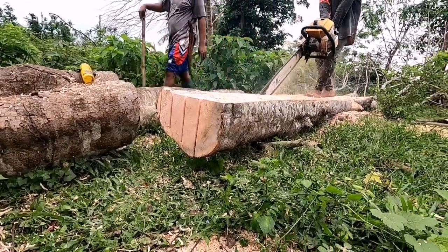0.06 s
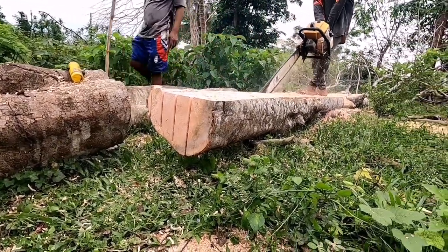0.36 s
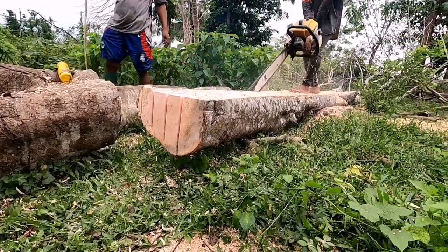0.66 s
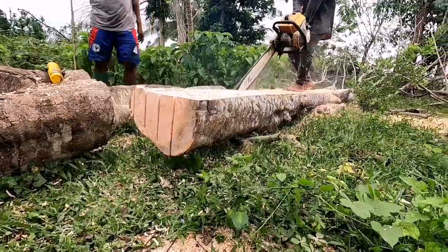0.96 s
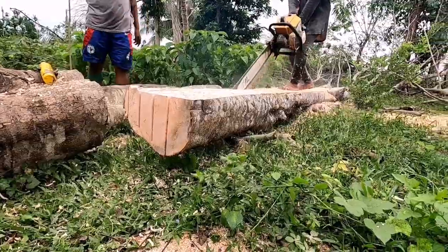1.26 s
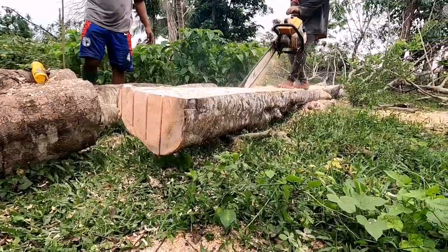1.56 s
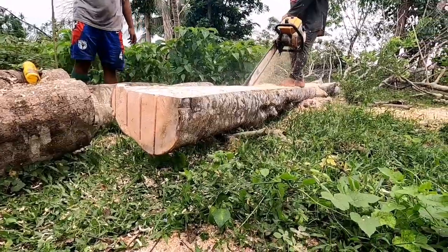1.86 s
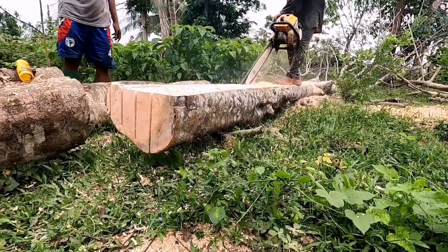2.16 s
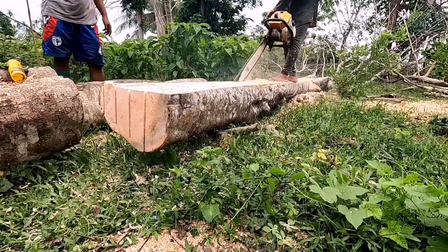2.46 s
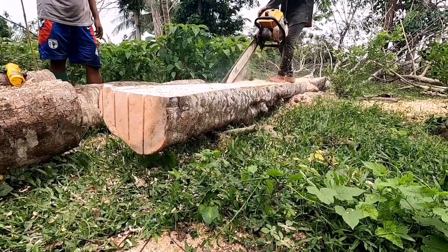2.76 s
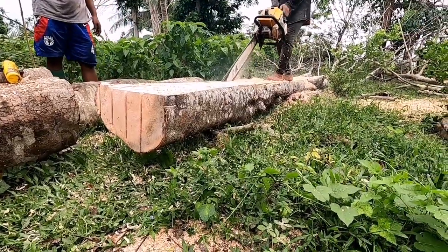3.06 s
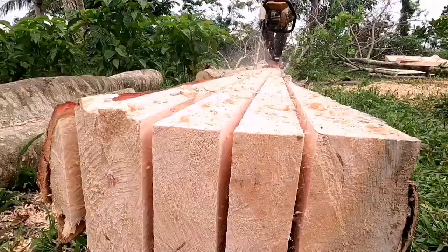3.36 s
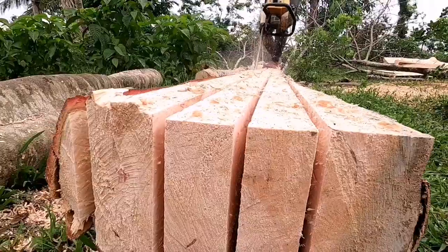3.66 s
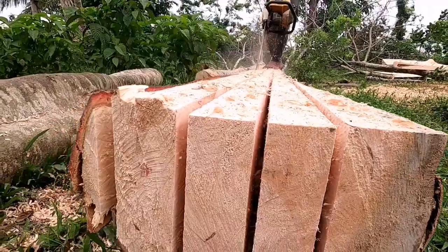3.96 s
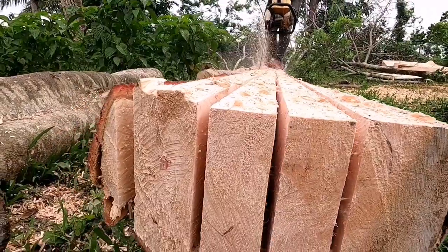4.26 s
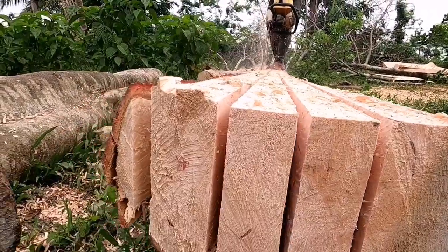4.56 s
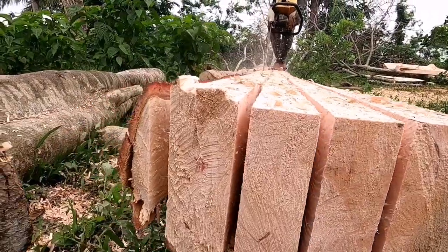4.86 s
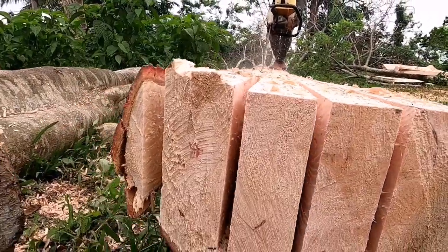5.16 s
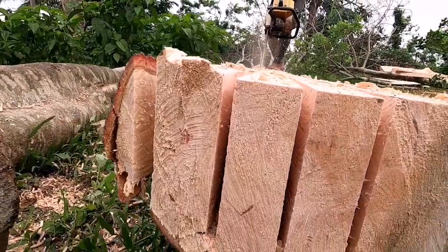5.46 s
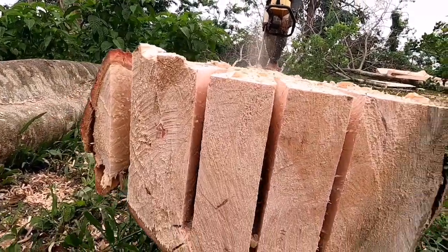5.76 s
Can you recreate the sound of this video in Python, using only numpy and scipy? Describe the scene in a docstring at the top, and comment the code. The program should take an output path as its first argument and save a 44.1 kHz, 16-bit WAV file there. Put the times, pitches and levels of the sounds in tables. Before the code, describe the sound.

A two-stroke chainsaw snarls at full throttle through a log outdoors, cuts out for an instant, then resumes slightly deeper.

```python
"""A two-stroke chainsaw snarls at full throttle, ripping along a log outdoors, heard from the side;
after a short silence it is heard from the log's end. Each firing sends a bark and a rasp of gas
through the muffler; when the load eases, the engine fires only every second turn and puffs between.
The chain tears out chips, the drive buzzes, the trees scatter it all back,
and a breeze rumbles on the microphone."""
import sys
import numpy as np
from scipy import signal
from scipy.fft import rfft, irfft
from scipy.io import wavfile
from scipy.ndimage import uniform_filter1d, map_coordinates

SR = 44100
rng = np.random.default_rng(int(sys.argv[2]) if len(sys.argv) > 2 else 0)


def wav_record(signal):
    """Record a signal, one row per channel, as 16-bit PCM in the file named by sys.argv[1]."""
    frames = np.transpose(np.atleast_2d(signal))
    bounded = np.clip(frames, -1, 1)
    # unit amplitude maps onto the largest positive 16-bit level
    quanta = np.round(bounded * 32767).astype(np.int16)
    wavfile.write(sys.argv[1], SR, quanta)


N = 260631
TIME = np.arange(N) / SR

# Crank speed, climbing while every turn fires, sagging in misfires or a deeper bite: time_s, speed_hz
SIDE_REVS = [(.0087, 91.77), (.105, 90.07), (.518, 93.29), (.737, 88.18), (1.0, 100.59), (1.338, 91.38),
             (1.992, 101.35), (2.002, 96.5), (2.433, 98.89), (2.815, 87.77), (2.949, 95.17), (3.2, 98.24),
             (3.39, 82.45)]
END_REVS = [(3.5585, 93), (3.69, 82.6), (4.065, 92.24), (4.203, 99.75), (4.387, 86.89), (4.585, 85.6),
            (4.938, 101.53), (5.027, 91.97), (5.181, 99.43), (5.397, 82.43), (5.725, 98.51), (5.799, 97.58),
            (5.91, 106.7)]
# Spells of running light, a miss after each firing: first_miss_s, last_miss_s, base_burn_share
LIGHT_SPELLS = [(1.058, 1.297, .15), (1.995, 2.169, .05), (2.262, 2.775, .06), (3.014, 3.077, .18),
                (3.210, 3.364, .08), (3.571, 3.684, .06), (3.907, 3.907, .6), (4.188, 4.229, .26),
                (4.260, 4.260, .25), (4.291, 4.425, .04), (4.655, 4.655, .1), (4.970, 5.055, .27),
                (5.200, 5.329, .14)]
# Stumbles, where this turn and the one before both miss: time_s
DOUBLE_MISSES = [1.067, 2.026, 2.643, 5.012, 5.066, 5.252, 5.306]
# Tone of one exhaust bark as it arrives over the ground: pitch_hz, level_db
SIDE_BARK = [(45, 18), (90, 28), (140, 27.5), (185, 24.5), (275, 7.5), (380, 16.5), (480, 10), (680, 20),
             (830, 19), (950, 25), (1250, 11), (1650, -2.5), (2900, -5.5), (4000, -13), (7000, -41.5)]
END_BARK = [(30, -8), (88, 32.5), (185, 31.5), (270, 18.5), (375, 7), (480, 19.5), (720, 28), (900, 17.5),
            (1150, 13.5), (1500, -2), (2300, 10.5), (3200, 8), (3800, -14), (7000, -34.5)]
# Ring of the muffler's shell: pitch_hz, width_hz, lift_db
SIDE_SHELL = [(2160, 300, 11), (3253, 260, 19.5), (4700, 100, 20)]
END_SHELL = [(2850, 330, 5.2), (3310, 150, 10.4)]
# Tone of the soft puff of an unburnt charge: pitch_hz, level_db
SIDE_PUFF = [(45, 20), (90, 25.5), (185, 22), (280, 5), (460, -16.5), (620, 17), (1000, 17.5), (1300, -8),
             (2300, -27), (4000, -48)]
END_PUFF = [(30, 10), (90, 28.5), (185, 26.5), (320, -3.5), (430, 1), (540, 20.5), (700, 23.5),
            (1000, 16.5), (1300, -10), (4000, -19.5)]
# Muffler chambers that hold back their own pitch: pitch_hz, sharpness_q
MUFFLER_CHAMBERS = [(717, 0.72), (312, 1.85)]
# Tone of the turbulent gas at the outlet: pitch_hz, level_db
SIDE_RASP = [(100, -22), (500, -40.5), (1000, -27.5), (1600, -38), (2200, -27), (2800, -34.5),
             (3300, -22.5), (3900, -38.5), (4650, -38), (6000, -47), (7400, -38.5), (8800, -43),
             (10500, -58.5), (12500, -51), (15000, -91)]
END_RASP = [(100, -51), (500, -40), (850, -49), (1500, -42), (2500, -43), (3200, -36), (3800, -37),
            (5400, -40), (6500, -34), (8800, -43.5), (11000, -65), (15000, -123)]
# Tone of the chain and its chips: pitch_hz, level_db
SIDE_CHAIN = [(100, -16), (400, -33), (900, -18.5), (1600, -37), (2400, -34.5), (3400, -45), (4600, -42),
              (6000, -44), (8000, -49), (10500, -55.5), (12500, -55.5), (15000, -72)]
END_CHAIN = [(100, -22), (400, -31.5), (800, -19), (1600, -35.5), (2500, -26), (3300, -38), (3800, -39.5),
             (5400, -48), (6500, -45), (8800, -59), (11000, -77), (15000, -78)]
# Tone of the breeze on the microphone: pitch_hz, level_db
BREEZE_RUMBLE = [(15, -10), (45, -20.5), (80, -23), (160, -39), (500, -78)]
# Tone of the highest hiss: pitch_hz, level_db
TOP_HISS_TONE = [(3000, -76), (9000, -58), (12500, -62), (15000, -72)]
# Fade-in of the highest hiss: time_s, gain_db
TOP_HISS_FADE_IN = [(3.56, -14), (4.1, -9), (4.5, -1), (5.91, 1.5)]
# Slow rise in level after the silence: time_s, gain_db
END_SWELL = [(3.56, -3), (4.1, -1.06), (4.6, -0.6), (5.91, -0.5)]
# Faders for the two listening places: time_s, open_share
SIDE_FADER = [(3.385, 1), (3.387, 0)]
END_FADER = [(3.557, 0), (3.61, 1)]

CRUISE_HZ = 94  # crank turns a second
HONK_HZ, EDGE_HZ, KERF_HZ = (650, 1010), (1030, 1800), (5670, 9000)  # bands that follow the effort


def undb(db):
    """Decibels to gain."""
    return 10 ** (np.asarray(db) / 20)


def curve(table):
    """Breakpoints joined into a line through time."""
    return np.interp(TIME, *np.transpose(table))


def response(spectrum, rings=(), size=2048):
    """Causal impulse response of a spectrum with resonances on top, falling away past its last point."""
    f = np.maximum(np.arange(size + 1) * SR / (2 * size), 1)
    hz, db = np.transpose(spectrum)
    db = np.interp(np.log(f), np.log(hz), db) - 20 * np.log(np.maximum(f / hz[-1], 1))
    for centre, width, lift in rings:
        db = db + lift / (1 + (2 * (f - centre) / width) ** 2)
    # minimum phase keeps the attack up front
    cepstrum = irfft(np.log(undb(db)))
    cepstrum[1:size] *= 2
    cepstrum[size + 1:] = 0
    return irfft(np.exp(rfft(cepstrum)))[:size]


def ring(x, impulse):
    """Pass channels through an impulse response."""
    return signal.fftconvolve(np.atleast_2d(x), np.atleast_2d(impulse), axes=1)[:, :N]


def wander(rate_hz):
    """Slow random drift with a spread near 1."""
    hold = int(SR / rate_hz)
    steps = np.repeat(rng.standard_normal(N // hold + 1), hold)
    return 1.3 * uniform_filter1d(uniform_filter1d(steps, hold), hold)[:N]


def noise(width):
    """Stereo white noise; width is the share of its power that is opposite in the two ears."""
    mid, side = rng.standard_normal((2, N))
    return np.sqrt(1 - width) * mid + np.sqrt(width) * side * np.array([[1], [-1]])


def strike(times, sizes, paces, shape):
    """Trigger a shape at each time, with its own size and playback pace."""
    index = (times * SR).astype(int)[:, None] + np.arange(len(shape))
    age = (index - times[:, None] * SR) * paces[:, None]
    values = sizes[:, None] * np.interp(age, np.arange(len(shape)), shape, left=0, right=0)
    return np.bincount(np.maximum(index, 0).ravel(), values.ravel(), N)[:N]


def ride_band(x, band_hz, gain):
    """Raise or lower one band of a sound by a moving gain."""
    band = signal.sosfiltfilt(signal.butter(1, band_hz, "band", fs=SR, output="sos"), x)
    return x + (gain - 1) * band


def crank(speed, flywheel_s=0.044, jitter_s=1e-5, stumble_burn=0.087, catch_share=0.14, catch_s=0.04):
    """The engine's rhythm: when the exhaust port opens, how fully each charge burns, angle in turns."""
    smooth_hz = uniform_filter1d(curve(speed), int(flywheel_s * SR))  # the flywheel rounds off changes
    angle = np.cumsum(smooth_hz) / SR
    angle = angle - np.interp(speed[0][0], TIME, angle)
    angle = angle + 0.016 * wander(14)  # the chain's bite tugs at the crank
    turns = np.arange(np.interp(speed[-1][0], TIME, angle))
    times = np.interp(turns, angle, TIME)
    fire_luck, miss_luck, timing_luck = rng.standard_normal((len(times), 3)).T
    half_turn_s = 0.5 / CRUISE_HZ
    missed = np.abs(times[:, None] - DOUBLE_MISSES).min(axis=1) < half_turn_s
    missed = missed | np.roll(missed, -1)
    burn = np.where(missed, stumble_burn, undb(-0.04 * fire_luck))
    for first, last, share in LIGHT_SPELLS:
        for k in np.flatnonzero((times > first - half_turn_s) & (times < last + half_turn_s)):
            if not (missed[k] or missed[k - 1]):
                missed[k] = True
                # weak turns burn better towards the end of a spell
                catching = np.exp(-abs(last - times[k]) / catch_s) - np.exp(-abs(last - first) / catch_s)
                burn[k] = np.clip((share + catch_share * catching) * undb(5 * miss_luck[k]), 0, 1)
    return times + jitter_s * timing_luck, burn, angle


def engine_effort(speed, drive, settle_s=0.06):
    """Revs in semitones above cruising, and lightness: 0 in the cut, near 1 firing every second turn."""
    revs = 12 * np.log2(curve(speed) / CRUISE_HZ)
    light = uniform_filter1d(2 * (1 - drive), int(settle_s * SR))  # the load is felt over a few turns
    return revs, light


def follow(effort, db, rev_db, light_db):
    """A layer's gain: db when cruising, plus rev_db a semitone of revs and light_db running light."""
    revs, light = effort
    return undb(db + rev_db * revs + light_db * light)


def muffler_heat(effort, times, cruise, per_rev, when_light, lag_s=0.091):
    """Hotter gas rings the muffler higher: lagging shifts in semitones set each turn's playback pace."""
    revs, light = effort
    keep = np.exp(-1 / (lag_s * SR))
    semitones = cruise + signal.lfilter([1 - keep], [1, -keep], per_rev * revs + when_light * light)
    return 2 ** (np.interp(times, TIME, semitones) / 12)


def exhaust(times, burn, pace, bark, puff, puff_late_s, rebound_db, wobble=0.004):
    """A firing barks, harder after a miss has flushed the cylinder; an unburnt charge puffs out late."""
    pace = pace * (1 + wobble * rng.standard_normal(len(times)))
    miss = np.clip(1 - burn, 0, 1)
    barks = strike(times, burn * undb(rebound_db * np.roll(miss, 1)), pace, bark)
    puffs = strike(times + puff_late_s, miss, pace, puff)
    gas = barks + puffs
    # each chamber is an all-pass: the crack leads, the honk follows and the thump comes last
    for hz, q in MUFFLER_CHAMBERS:
        _, poles = signal.iirpeak(hz, q, fs=SR)
        gas = signal.lfilter(poles[::-1], poles, gas)
    return gas


def gas_rasp(times, burn, tone, width, rise_s, fall_s, scatter_db=2.0):
    """Hot gas tears out of the port after each firing and dies away within the turn."""
    age = TIME[:1024]
    burst = (1 - np.exp(-age / rise_s)) * np.exp(-age / fall_s)
    sizes = burn * undb(scatter_db * rng.standard_normal(len(times)))
    train_rms = np.sqrt(np.sum(burst ** 2) / SR / np.mean(np.diff(times)))
    envelope = strike(times, sizes, np.ones(len(times)), burst) / train_rms
    return ring(noise(width) * envelope, tone)


def chain(tone, width, waver_db, chips_per_s=1400, chip_spread_db=4.5, chip_db=-3):
    """Cutters hiss in the kerf and snap off chips of all sizes; the bite wavers."""
    snaps = rng.random(N) < chips_per_s / SR
    chips = snaps * undb(chip_spread_db * np.minimum(rng.exponential(size=N), 5))
    grain = np.sqrt(1 + (undb(chip_db) * chips) ** 2 / np.mean(chips ** 2))
    gritty_hiss = noise(width) * grain / np.sqrt(np.mean(grain ** 2))
    return ring(gritty_hiss * undb(waver_db * wander(14)), tone)


def drive_buzz(angle, drive, db, band_hz, peak_turn, depth, drift=0.56, coast_db=-8, size=400):
    """Intake, piston and drive rattle alike each turn: a metallic buzz that slackens in a misfire."""
    shapes = rng.standard_normal((3, size))
    steady, *loose = (map_coordinates(s, [angle % 1 * size], order=1, mode="grid-wrap") for s in shapes)
    rattle = steady + drift * sum(part * wander(5) for part in loose)
    pulse = 1 + depth * np.cos(2 * np.pi * (angle - peak_turn))
    buzz = signal.sosfilt(signal.butter(3, band_hz, "band", fs=SR, output="sos"), pulse * rattle)
    return undb(db + coast_db * (0.5 - drive)) * buzz / np.std(buzz)


def tree_echo(x, db, width, t60_s=0.25, predelay_s=0.0049, dull_hz=3500):
    """Trunks and foliage add a short, dull echo."""
    age = TIME[:SR // 2]
    tail = noise(width)[:, :len(age)] * (age > predelay_s) * np.exp(-np.log(1000) * age / t60_s)
    tail = tail / np.sqrt(np.sum(tail[0] ** 2))
    tail = signal.lfilter(*signal.butter(1, dull_hz, fs=SR), tail)
    return x + undb(db) * ring(x.mean(axis=0), tail)


def breeze(gain_db, width, gust_db=5.5):
    """Light gusts rumble on the microphone."""
    return ring(noise(width), response(BREEZE_RUMBLE)) * undb(gain_db + gust_db * wander(2.2))


def saw_from_side(left_lag_s=0.000032, balance_db=-1.2):
    """The saw sits a little to the right: the left ear hears it later and softer."""
    times, burn, angle = crank(SIDE_REVS)
    drive = np.interp(TIME, times, burn)
    effort = engine_effort(SIDE_REVS, drive)
    pace = muffler_heat(effort, times, cruise=-0.19, per_rev=0.15, when_light=0.4)
    bark, puff = response(SIDE_BARK, SIDE_SHELL), response(SIDE_PUFF)
    gas = exhaust(times, burn, pace, bark, puff, puff_late_s=0.00066, rebound_db=1.4)
    # running light, the honk thins and leaves the pops a harder edge
    gas = ride_band(gas, HONK_HZ, follow(effort, db=2.16, rev_db=0.5, light_db=-3.1))
    gas = ride_band(gas, EDGE_HZ, follow(effort, db=-0.6, rev_db=0.5, light_db=0))
    rasp = gas_rasp(times, burn, response(SIDE_RASP), width=0.4, rise_s=0.00074, fall_s=0.0026)
    cut = chain(response(SIDE_CHAIN), width=0.3, waver_db=0.9)
    saw = (gas * follow(effort, db=0, rev_db=-0.2, light_db=0.65)
           + rasp * follow(effort, db=2, rev_db=0, light_db=3.5)
           + cut * follow(effort, db=5, rev_db=-0.8, light_db=-0.9))
    saw += drive_buzz(angle, drive, db=-45.5, band_hz=(2216, 2430), peak_turn=1.0, depth=0.35)
    saw += drive_buzz(angle, drive, db=-44.5, band_hz=(3170, 3540), peak_turn=0.045, depth=1.0)
    left, right = tree_echo(saw, db=-23, width=0.6)
    left = undb(balance_db) * np.interp(TIME - left_lag_s, TIME, left)
    return np.array([left, right]) * undb(-balance_db / 2) + breeze(gain_db=-9, width=0.32)


def saw_from_end():
    """Straight ahead along the log: deeper, almost mono; the highest hiss fades up over the first second."""
    times, burn, angle = crank(END_REVS)
    drive = np.interp(TIME, times, burn)
    effort = engine_effort(END_REVS, drive)
    pace = muffler_heat(effort, times, cruise=0.28, per_rev=0.21, when_light=-0.96)
    bark, puff = response(END_BARK, END_SHELL), response(END_PUFF)
    gas = exhaust(times, burn, pace, bark, puff, puff_late_s=0.00057, rebound_db=1.6)
    # the honk swells with the revs
    gas = ride_band(gas, HONK_HZ, follow(effort, db=1.6, rev_db=0.5, light_db=-3.8))
    rasp_tone = response(END_RASP, END_SHELL)
    rasp = gas_rasp(times, burn, rasp_tone, width=0.0026, rise_s=0.00025, fall_s=0.0028)
    top_hiss = undb(curve(TOP_HISS_FADE_IN)) * chain(response(TOP_HISS_TONE), width=0.0002, waver_db=3)
    cut = chain(response(END_CHAIN), width=0.000067, waver_db=1.9)
    saw = gas + rasp * follow(effort, db=0.7, rev_db=-0.2, light_db=0.9)
    saw += (cut + top_hiss) * follow(effort, db=6, rev_db=0.2, light_db=-2.5)
    # the kerf hisses most when a deep bite drags the engine down
    saw = ride_band(saw, KERF_HZ, follow(effort, db=-0.5, rev_db=-0.4, light_db=-1.5))
    saw += drive_buzz(angle, drive, db=-37.5, band_hz=(2230, 3290), peak_turn=0.76, depth=0.76)
    saw = tree_echo(saw, db=-26, width=0.001)
    return saw * undb(curve(END_SWELL)) + breeze(gain_db=-18, width=0.001)


def scene():
    """One listening place after the other, with the deepest rumble rolled off."""
    rumble_cut = signal.butter(1, 15, "high", fs=SR, output="sos")
    side = signal.sosfilt(rumble_cut, saw_from_side())
    end = signal.sosfilt(rumble_cut, saw_from_end())
    return side * curve(SIDE_FADER) + end * curve(END_FADER)


def record(dry):
    """A steep low-pass takes the air off the top."""
    top_hz = 15300
    return signal.sosfilt(signal.ellip(8, 0.2, 70, top_hz, fs=SR, output="sos"), dry)


dry = scene()
out = record(dry)
wav_record(out)
```